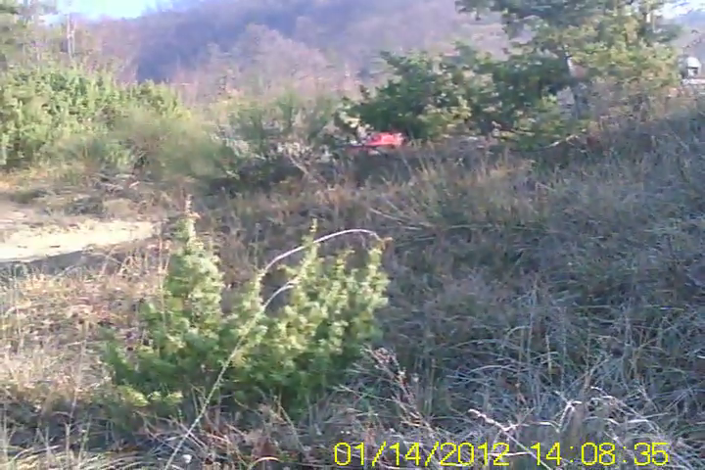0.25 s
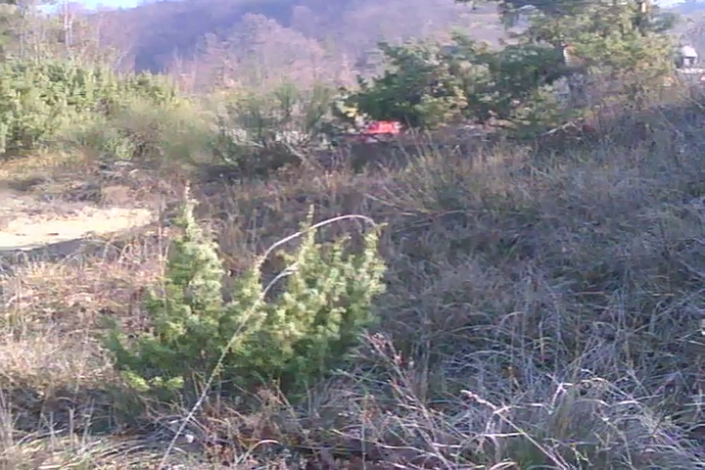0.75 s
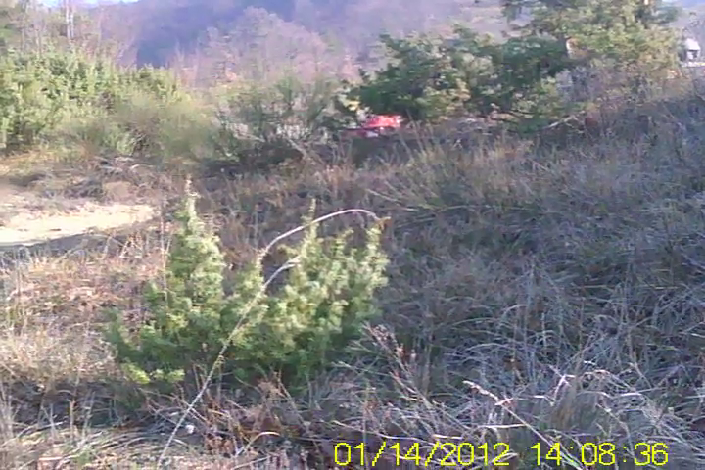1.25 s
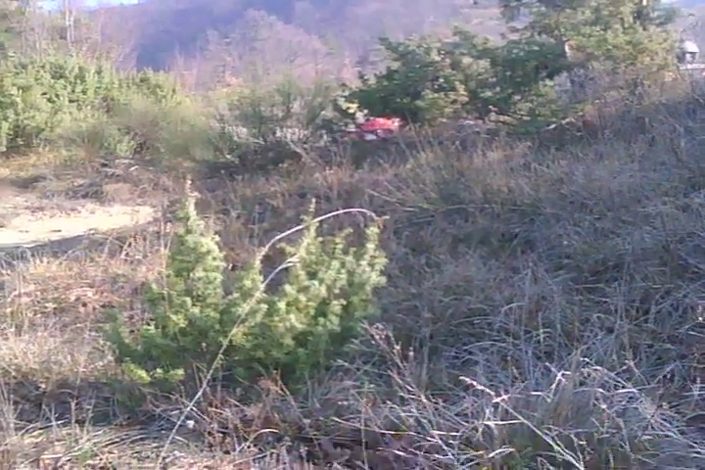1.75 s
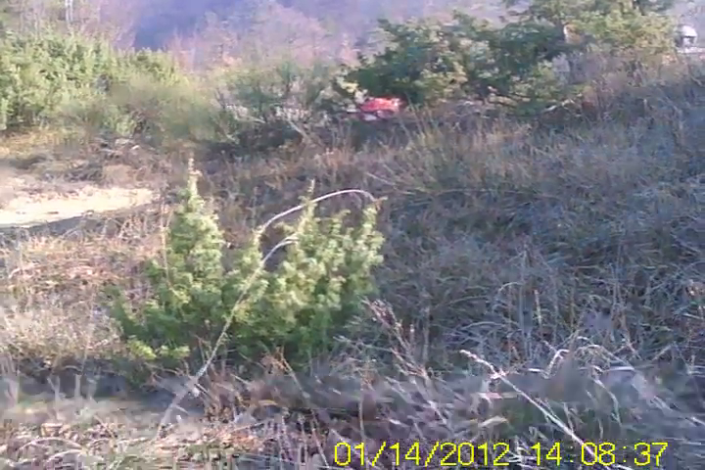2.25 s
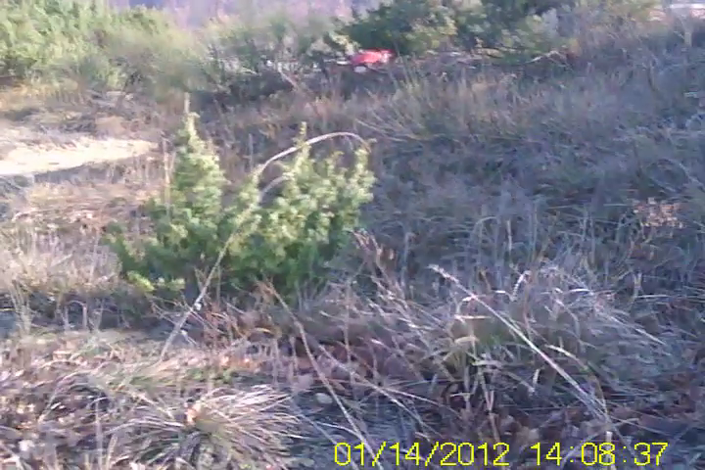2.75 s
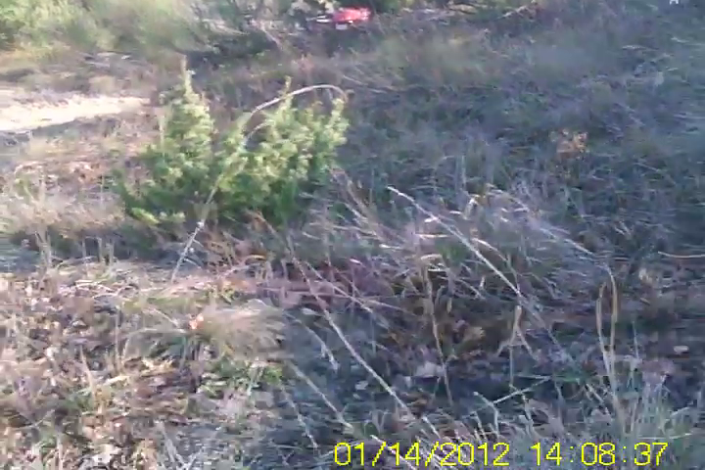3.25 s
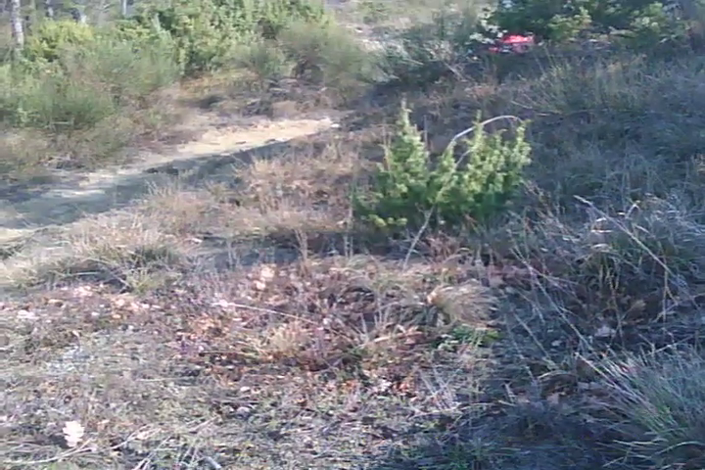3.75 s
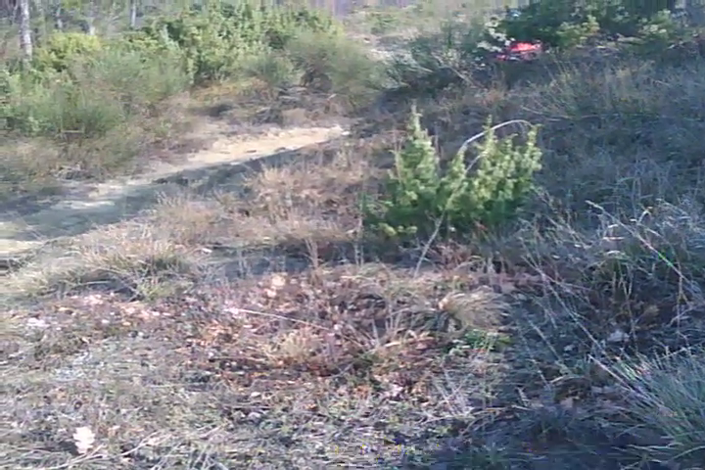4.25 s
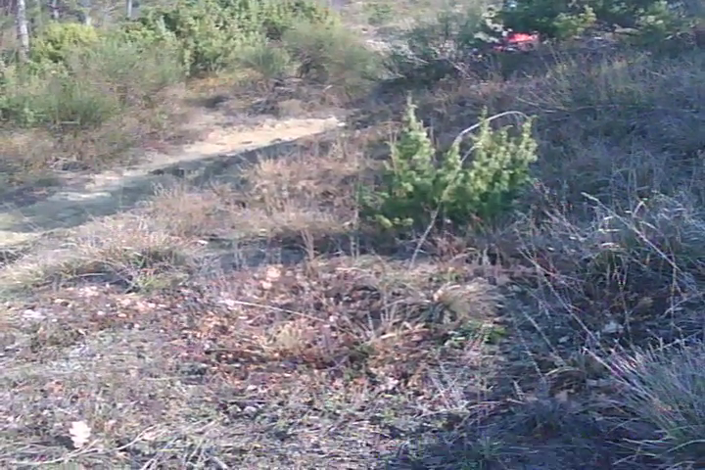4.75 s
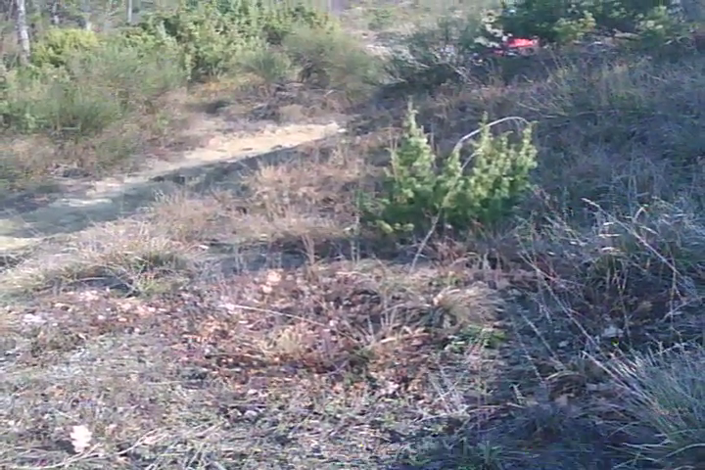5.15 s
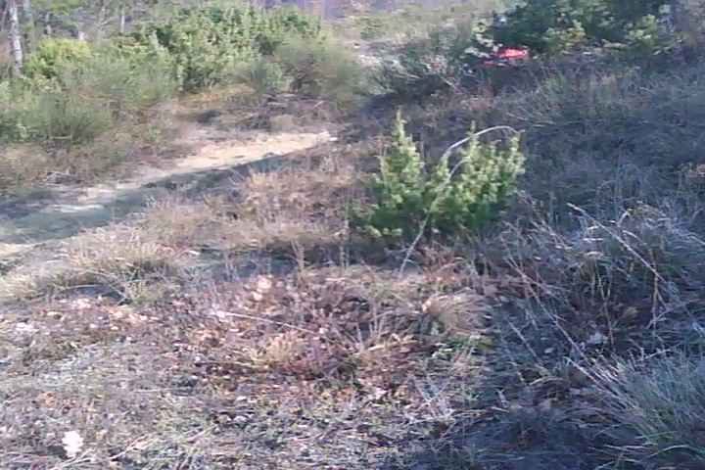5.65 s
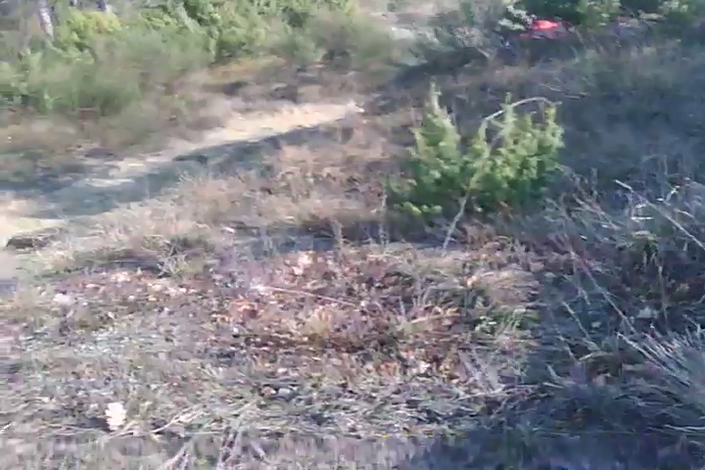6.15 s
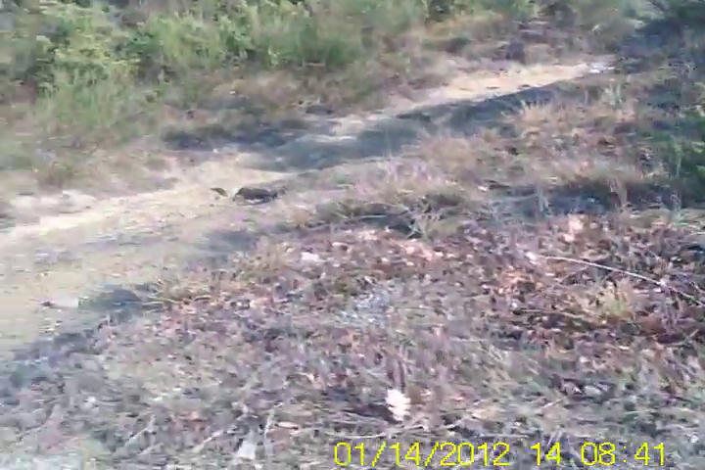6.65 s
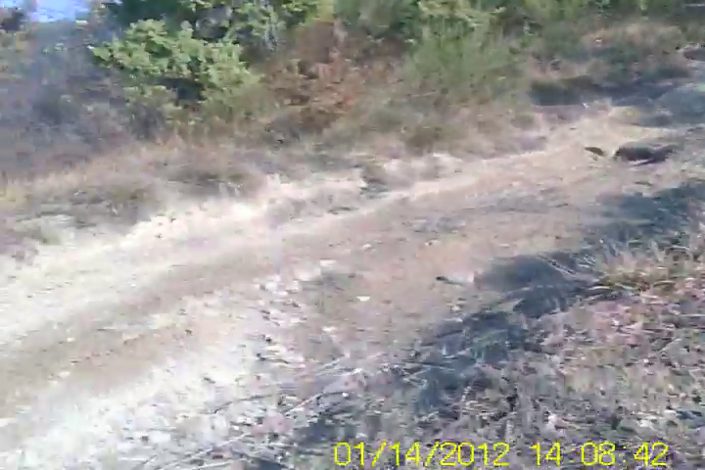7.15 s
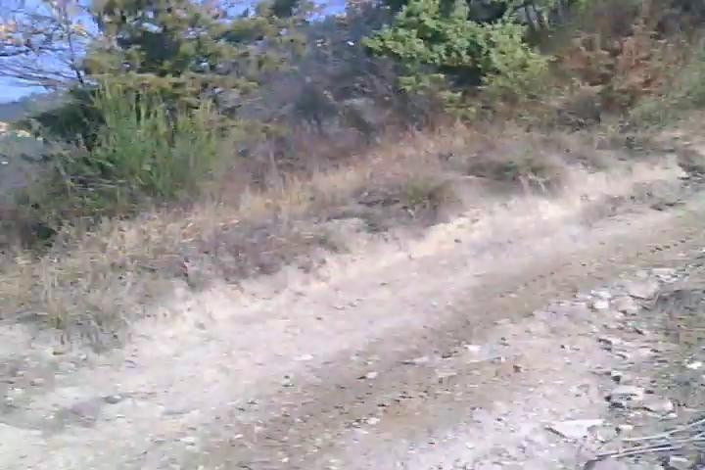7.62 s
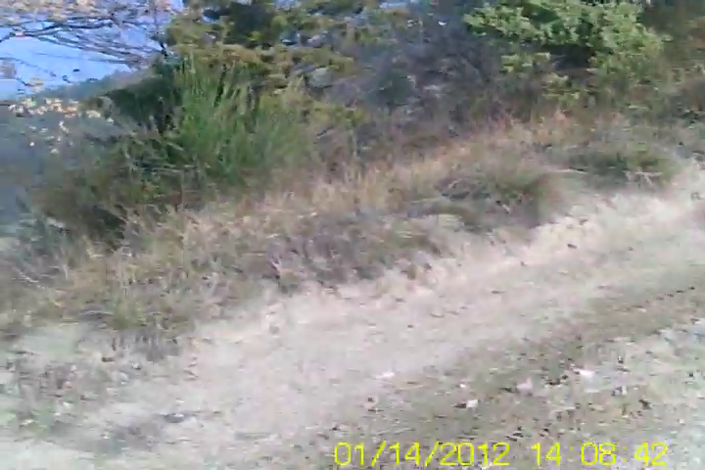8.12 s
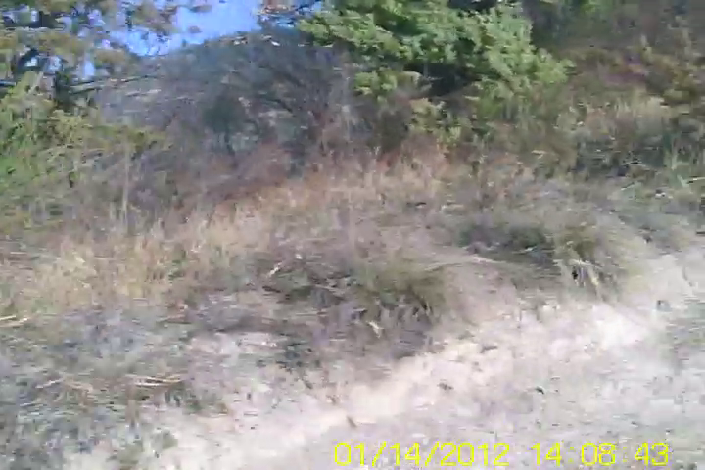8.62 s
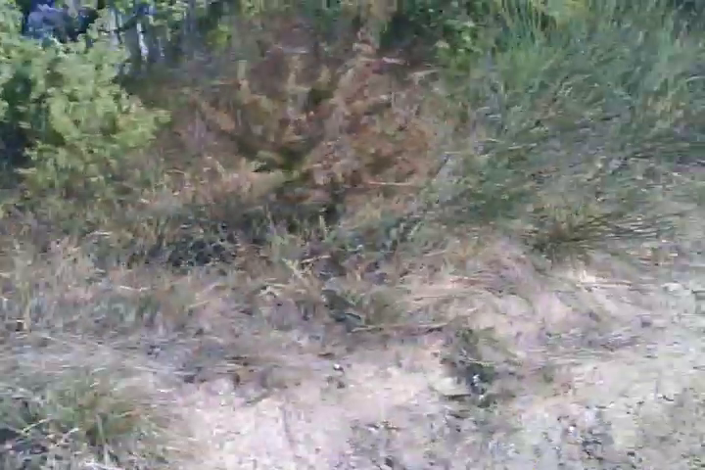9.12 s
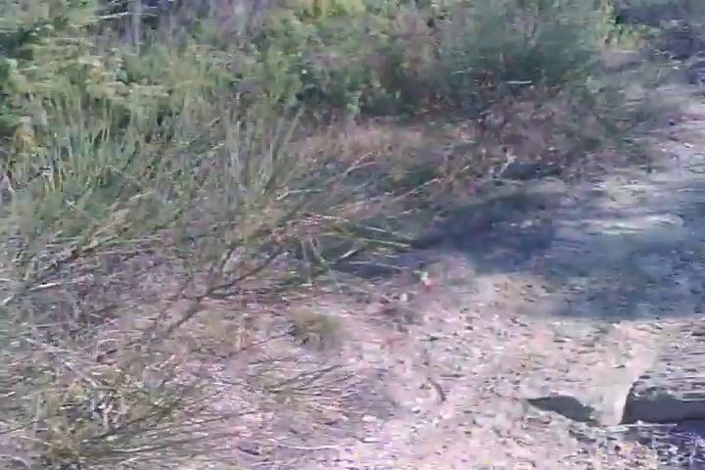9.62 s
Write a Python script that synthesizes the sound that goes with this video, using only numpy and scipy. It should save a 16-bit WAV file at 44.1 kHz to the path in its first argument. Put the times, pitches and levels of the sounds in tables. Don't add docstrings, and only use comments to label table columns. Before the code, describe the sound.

Chugging quad engine idle with light wind and camera knocks, a short throttle blip, then a long rattling rev that falls away.

```python
import sys
import numpy as np
from scipy import signal
from scipy.fft import rfft, irfft
from scipy.io import wavfile
from scipy.ndimage import uniform_filter1d

SR = 44100
rng = np.random.default_rng(int(sys.argv[2]) if len(sys.argv) > 2 else 0)


def natural_amplitude(level_db):
    exponent = np.asarray(level_db, float) / 20
    return 10 ** exponent


def output_pcm(signal):
    pcm = np.clip(np.atleast_2d(signal).T, -1, 1) * 32767
    wavfile.write(sys.argv[1], SR, np.round(pcm).astype(np.int16))


N = 435708
IDLE_RATE = 14.8


def curves(rows):
    seconds, *columns = np.transpose(rows)
    return [np.interp(np.arange(N) / SR, seconds, column) for column in columns]


def steady(x, seconds=.4):
    size = int(seconds * SR)
    power = uniform_filter1d(uniform_filter1d(x ** 2, size), size)
    return x / np.sqrt(power + 1e-12)


def ring(x, modes, count=1):
    out = 0
    for k, (hz, width, db) in enumerate(modes):
        part = x
        for _ in range(count):
            part = signal.lfilter(*signal.iirpeak(hz, hz / width, SR), part)
        out = out + (-1) ** k * natural_amplitude(db) * part
    return out


def noise(points):
    points_hz, db = np.transpose(points)
    hz = np.fft.rfftfreq(N, 1 / SR)
    gain = natural_amplitude(np.interp(np.log(hz + 1), np.log(points_hz), db, -90, -90))
    x = irfft(rfft(rng.standard_normal(N)) * gain, N)
    return x / x.std()


def train(clock, places, sizes):
    at = np.searchsorted(clock, places)
    return np.bincount(np.minimum(at, N - 1), sizes * (at < N) * (at > 0), N)


def swell(x, centre, width, height):
    return height * np.exp(-.5 * ((x - centre) / width) ** 2)


# (time [s], rate [firings/s])
SPEED = [(0.0, 14.93), (2.13, 14.67), (2.75, 24.59), (3.09, 19.02), (3.49, 17.49), (3.66, 15.4),
         (4.21, 14.54), (5.54, 14.91), (5.8, 22.96), (6.17, 31.3), (6.74, 29.94), (7.18, 27.21),
         (7.81, 26.74), (8.19, 23.12), (8.65, 23.99), (8.88, 25.89), (9.29, 25.26), (9.88, 14.93)]
# (time [s], effort or drift
# against idle [dB])
EFFORT = [(0, 2), (1.1, 0.5), (1.6, -1.5), (2.2, -0.5), (2.55, 10), (2.82, 9), (3.0, 1.5), (3.6, -0.5),
          (5.45, -2), (5.8, 13), (6.2, 15), (7.1, 10.5), (7.7, 14), (8.0, 7.5), (8.75, 13), (9.32, 11),
          (9.5, 1.5), (9.88, -1)]


def follow(idle_db, share, per_rate=0):
    rate, effort = curves(SPEED)[0], curves(EFFORT)[0]
    return idle_db + np.minimum(effort, 0) + share * np.maximum(effort, 0) + per_rate * (rate - IDLE_RATE)


# (time [s], peak level [dB], half length [s])
GUSTS = [(.6, -28, 0.24), (1.223, -23, 0.16), (2.49, -36, 0.22), (3.0, -28, 0.17), (3.494, -28.5, 0.19),
         (4.6, -32.5, 0.17), (5.7, -36, 0.12), (7.4, -37, .4), (8.2, -26, 0.43), (8.898, -27.5, 0.36),
         (9.305, -24, 0.14), (9.69, -27.5, 0.26)]


def wind():
    lumps = natural_amplitude(4.0 * noise([(1, 0), (6, -3), (12, -20)]))
    buffeting = noise([(4, -13), (10, -20), (30, -11), (60, 3.5), (110, -3.5), (250, -12)])
    t = np.arange(N) / SR
    calm_db = -43.5
    level = natural_amplitude(calm_db) + sum(swell(t, s, half_s, natural_amplitude(db)) for s, db, half_s in GUSTS)
    return level * steady(lumps * buffeting, 0.13)


# (time [s], snap peak [dB], thud [dB], scrape [dB])
KNOCKS = [(1.1757, -27, -5, -78), (1.1914, -35, -20, -41), (1.2937, -31, -2, -40),
          (1.3417, -35, -16.5, -42), (1.6018, -26, -21, -46), (2.216, -38, -29, -26),
          (3.728, -10, -26, -28), (3.998, -20, -28, -37), (4.2143, -24, -33, -40), (4.6506, -35, -12, -79),
          (4.723, -62, -19, -77), (4.757, -40, -17, -50), (4.929, -29, -38, -45), (5.1198, -26, -25, -47),
          (9.824, -22, -25, -34)]
# (frequency [Hz], width [Hz], level [dB])
SHELL = [(103, 115, 1), (337, 270, 2.5), (657, 430, -4), (1300, 450, -10)]


def knocks():
    size = 4000
    out, t = np.zeros(N + size), np.arange(size) / SR
    for s, snap_db, thud_db, scrape_db in KNOCKS:
        snap_hiss, thump, scrape_hiss = rng.standard_normal((size, 3)).T
        snap = np.diff(snap_hiss, prepend=0) * np.exp(-t / .0012) * 0.18
        thud = ring(thump * np.exp(-t / 0.0058), SHELL)
        thud = thud / abs(thud).max()
        scrape = np.diff(scrape_hiss, prepend=0) * np.exp(-t / 0.0064) * 0.077
        out[round(s * SR):][:size] += natural_amplitude(snap_db) * snap + natural_amplitude(thud_db) * thud + natural_amplitude(scrape_db) * scrape
    return out[:N]


# (time [s], ring level [dB], top treble level [dB])
SLAMS = [(2.7574, -18, -47), (5.8682, -15.5, -51), (6.0638, -4, -38), (6.098, -16, -41), (6.1967, -13, -49),
         (6.2565, -15, -41), (6.4493, -21, -42), (7.0263, -16, -57), (7.136, -9.5, -38),
         (7.2826, -6.5, -47), (7.3172, -13, -41), (7.3526, -14, -42), (7.3893, -16, -38), (7.794, -13, -48),
         (7.878, -15, -39), (7.9143, -13.5, -45), (8.1294, -13, -45), (8.1727, -6, -47), (8.471, -12, -62),
         (8.575, -19, -47), (8.6066, -6, -47), (8.742, -11, -47), (8.7906, 19, -40), (8.83, -5, -57),
         (8.8695, -3, -40), (8.9064, -11.5, -35), (8.948, -14, -49), (9.1038, -13.5, -45),
         (9.1336, -16, -50), (9.2128, -14, -45)]


def overload():
    s, _, top_db = np.transpose(SLAMS)
    clicks = train(np.arange(N) / SR, s, natural_amplitude(top_db + 18.0))
    burst = signal.oaconvolve(clicks, np.hanning(30), "same")
    band = signal.butter(4, [11500, 16200], "band", fs=SR, output="sos")
    return signal.sosfilt(band, burst * rng.standard_normal(N))


# (time [s], level [dB])
RATTLE = [
    [(2.2, -68), (2.394, -54), (2.422, -35.5), (2.862, -31), (2.924, -48), (2.986, -33), (3.302, -48.5),
     (3.338, -29.5), (3.6, -61)],
    [(5.55, -56), (5.72, -31), (6.21, -25), (6.88, -33.5), (7.39, -25), (8.03, -30.5), (8.75, -29),
     (9.3, -27), (9.48, -36)],
    [(9.48, -38), (9.59, -29.5), (9.69, -52), (9.71, -29.5), (9.76, -52), (9.88, -68)],
]
# (from [s], to [s], place in cycle [turns], level [dB])
STRIKES = [(2.2, 3.6, .16, -2), (2.2, 3.6, .39, 0), (2.2, 3.6, .63, 0), (2.2, 3.6, .83, -9),
           (2.2, 3.6, .90, 0), (5.5, 6.1, .08, -3), (5.5, 6.1, .58, -3), (5.8, 6.5, .19, -3),
           (5.5, 6.9, .30, -2), (5.8, 6.9, .69, -2), (6.0, 6.9, .46, -11), (5.9, 7.7, .95, -7),
           (5.5, 9.9, .81, 2), (6.9, 9.9, .07, 0), (6.9, 9.9, .36, -2), (6.9, 9.9, .59, -2),
           (7.0, 7.9, .72, -2), (8.6, 9.3, .72, -4), (7.7, 9.9, .18, -10), (6.1, 6.9, .07, -11),
           (6.1, 6.9, .57, -9)]
# (frequency [Hz], width [Hz], level [dB])
BRACKET = [(2350, 1500, 8), (3394, 460, 14), (4570, 730, 10.5), (6060, 460, 8), (7430, 900, 8),
           (11200, 1000, -5)]
# (frequency [Hz], density [dB per Hz])
BUZZ = [(3000, 11), (4500, 10.5), (5400, -6), (6200, -1.5), (8000, -6), (9200, 0), (10200, -22),
        (11500, -44)]


def rattle(turns):
    t, cycle = np.arange(N) / SR, np.arange(int(turns[-1]) + 1)
    when = np.interp(cycle, turns, t)
    rate = np.interp(when, t, curves(SPEED)[0])
    hits = np.zeros((len(BRACKET), N))
    for start, end, at, db in STRIKES:
        chance, scatter = .93 + .04 * db, .013 - .0015 * db
        roll = rng.random(len(cycle))
        size, late, side, back, *colour = rng.standard_normal((len(cycle), 4 + len(BRACKET))).T
        on = (when > start) * (when < end) * (roll < chance) * np.sign(side)
        places = cycle + at + scatter * late
        force = db + 4.0 * np.clip(size, -2.5, 1.5)
        rebound = force + .7 * (rate - 31) - 13.0 + 4.5 * back
        hits += [train(turns, places, on * natural_amplitude(force + 4.5 * c)) for c in colour]
        rebound_s = 0.0028
        hits += [train(turns, places + rebound_s * rate, on * natural_amplitude(rebound - 1.2 * c)) for c in colour]
    scrape_share, scrape_s = .12, .0006
    scrape = signal.lfilter([scrape_share], [1, -np.exp(-1 / (scrape_s * SR))], abs(hits).mean(0))
    hits = hits + scrape * rng.standard_normal(N)

    level = sum(natural_amplitude(curves(rows)[0]) * (t >= rows[0][0]) * (t < rows[-1][0]) for rows in RATTLE)
    s, slam_db, _ = np.transpose(SLAMS)
    clear = uniform_filter1d(train(t, s, np.ones(len(s))), 240) < 1e-6
    high = signal.butter(2, 2000, "high", fs=SR, output="sos")
    struck = sum(ring(hit, [mode]) for hit, mode in zip(hits * clear, BRACKET))
    struck = signal.lfilter(*signal.butter(4, 9300, fs=SR), struck)
    struck = steady(signal.sosfilt(high, struck), 0.13)
    slam_pulses = train(t, s, natural_amplitude(np.minimum(slam_db, -7) + 17.5) * rng.choice([-1, 1], len(s)))
    slam_edge = (8860, 5400, -9)
    slams = signal.sosfilt(high, ring(slam_pulses, BRACKET + [slam_edge]))
    return level * natural_amplitude(4.0) * struck + slams + level * natural_amplitude(-28) * noise(BUZZ)


# (frequency [Hz], width [Hz], level [dB])
CASE = [(559, 223, -19), (816.8, 39, -8), (1059, 200, -1), (1473, 60, 5.5), (1618, 113, 5), (2099, 94, 4),
        (2336, 240, -7)]
# (frequency [Hz], width [Hz], level [dB])
CASE_TOP = [(3300, 1000, -10.5), (3654, 420, -6), (4198, 177, -9)]
# (frequency [Hz], density [dB per Hz])
CASE_BODY = [(260, 11), (450, 13.5), (1100, -2), (1280, -4.5), (1480, -10), (2110, -7.5), (2960, -17),
             (4150, -28), (5200, -86), (6760, -63), (11400, -120)]
# (frequency [Hz], density [dB per Hz])
FIZZ = [(4000, -16), (4700, 1), (5100, -8), (5500, -2), (6100, -0.5), (7000, -7.5), (8200, 1.5),
        (9300, -11), (10400, -16.5), (11500, -28), (12500, -45)]
# (place in cycle [turns], length [turns], level [dB])
VALVES = [
    (.06, 0.027, 5.5),
    (.40, 0.15, 2.5),
    (.66, 0.031, -2),
    (.90, 0.1, 5.5),
]


def chatter(turns):
    cycle = np.arange(int(turns[-1]) + 2)
    luck = natural_amplitude(1.5 * rng.standard_normal((len(cycle), len(VALVES))))[turns.astype(int)]
    gate = .2
    for k, (at, long, db) in enumerate(VALVES):
        distance = (turns - at + .5) % 1 - .5
        gate = gate + luck[:, k] * swell(distance, 0, long, natural_amplitude(db))
    ticks = rng.standard_normal(N) * natural_amplitude(2.0 * np.minimum(rng.exponential(1, N), 4))
    places, sizes = rng.random(60), rng.standard_normal(60)
    gears = train(turns, (cycle[:, None] + places).ravel(), np.tile(sizes, len(cycle)))
    tight = np.interp(curves(SPEED)[0], [16, 28], [.2, .4])
    case = steady(ring(gate * ticks, CASE + CASE_TOP))
    case += (.9 - 1.2 * tight) * steady(gate * noise(CASE_BODY))
    case += tight * steady(ring(gate * gears, CASE[:2], count=2))
    fizz = steady((gate + 1.2) * noise(FIZZ))
    case_db = follow(idle_db=-33.5, share=0.38, per_rate=0.38)
    fizz_db = follow(idle_db=-56, share=0.13, per_rate=0.66)
    return natural_amplitude(case_db) * steady(case) + natural_amplitude(fizz_db) * fizz


# (order of the cycle, idle level [dB], share of effort, resonance [Hz], width [Hz], swell [dB])
FRAME = [
    (1, -46.5, 0.67, 31, 8, 14),
    (2, -32.5, 0.054, 47, 11.5, 5.5),
    (3, -34, .05, 64, 28, -2),
    (4, -31.5, 0.044, 77, 3.3, 12.5),
]
# (frequency [Hz], width [Hz], swell [dB])
FRAME_TOP = (127.6, 16.4, 10.4)


def shake(turns):
    crank_at = 0.311
    angle, rate = 2 * np.pi * (turns - crank_at), curves(SPEED)[0]
    first, second, third, fourth = (np.sqrt(2) * natural_amplitude(follow(db, share) + swell(order * rate, *tune))
                                    for order, db, share, *tune in FRAME)
    fourth = fourth * natural_amplitude(swell(4 * rate, *FRAME_TOP))
    low = -first * np.sin(angle) - second * np.cos(2 * angle)
    return low + third * np.sin(3 * angle) + fourth * np.cos(4 * angle)


# (frequency [Hz], width [Hz], level [dB])
PIPE = [(41.8, 21, -30), (68.5, 60, -1.5), (108.7, 39.5, -0.5), (173, 118, 4)]
# (frequency [Hz], width [Hz], level [dB])
SILENCER = [(169, 91, -1), (239.2, 38.6, 7.5), (305.8, 19, 1), (369, 54.7, 0), (490.4, 53, -12),
            (602, 110, -20), (828, 400, -18), (1053, 53, -23)]
# (frequency [Hz], width [Hz], level [dB])
PUFF = [(276, 71, 5), (424, 310, -8)]


def exhaust(turns):
    rate, effort = curves(SPEED)[0], curves(EFFORT)[0]
    coasting = np.clip((rate - IDLE_RATE - 1) / 2, 0, 1) * np.clip(1 - effort / 6, 0, 1)
    tuned_db = swell(5 * rate, 124, 11.3, 1.92)
    pipe_db = follow(idle_db=-23, share=0.086) + tuned_db - 4.5 * coasting
    silencer_db = -33 + effort

    firing_at, intake_later = 0.1746, 0.2116
    size, late = rng.standard_normal((int(turns[-1]) + 2, 2)).T
    place = turns - firing_at
    cycle = np.floor(place + .6).astype(int)
    strength = uniform_filter1d(natural_amplitude(1.0 * size)[cycle], 400)
    place = place + uniform_filter1d(.0015 * late[cycle], 400)
    intake = np.clip(.04 * effort, 0, 1)

    def wave(k, later=0):
        return np.cos(2 * np.pi * k * (place - later))

    blow_edge_hz = 134.3
    slow = sum((strength * wave(k) + intake * wave(k, intake_later)) / (1 + (k * rate / blow_edge_hz) ** 8)
               for k in range(5, 12))
    sharp = strength * sum(wave(k) / (1 + (8 / k) ** 6) for k in range(6, 36))
    gas = (.5 + np.exp(-(place % 1) / .5)) * rng.standard_normal(N)
    roar = np.interp(rate, [16, 21], [1.2, .2])
    silencer = steady(ring(sharp, SILENCER, count=2)) + roar * steady(ring(gas, PUFF, count=2))
    pipe = steady(ring(slow, PIPE, count=2))
    pipe += .15 * steady(ring(gas, PIPE, count=2))
    return natural_amplitude(pipe_db) * pipe + natural_amplitude(silencer_db) * steady(silencer)


def scene():
    turns = np.cumsum(curves(SPEED)[0]) / SR
    engine = exhaust(turns) + shake(turns) + chatter(turns) + rattle(turns)
    return (wind() + knocks() + engine)[None]


def low_pass(x):
    return signal.sosfilt(signal.butter(12, 16960, fs=SR, output="sos"), x)


def record(dry):
    edge_hz, offset = 10900, -.0052
    hz = np.fft.rfftfreq(N, 1 / SR)
    treble = 1 / np.sqrt(1 + (hz / edge_hz) ** 32)
    rounded = .8 * np.tanh(dry / .8)
    wet = irfft(rfft(rounded) * treble, N) + overload()
    return low_pass(wet + offset)


dry = scene()
out = record(dry)
output_pcm(out)
```